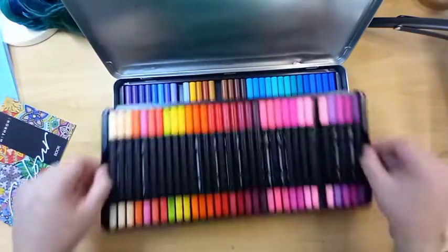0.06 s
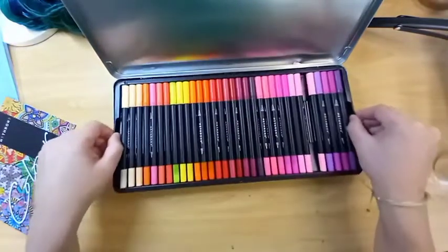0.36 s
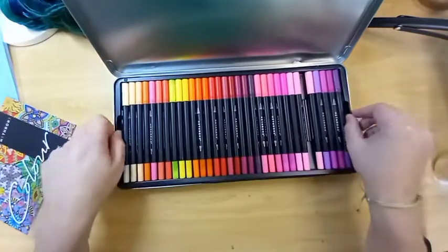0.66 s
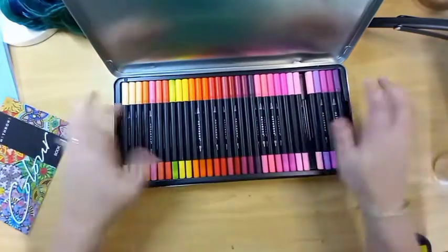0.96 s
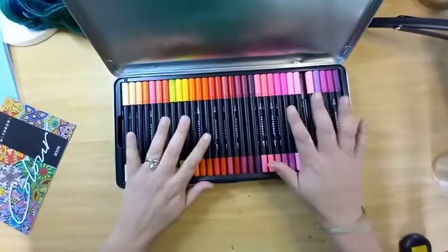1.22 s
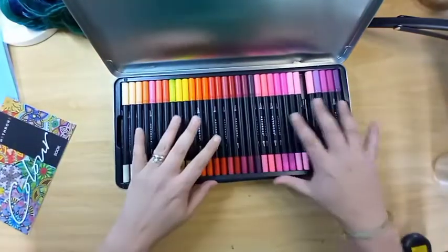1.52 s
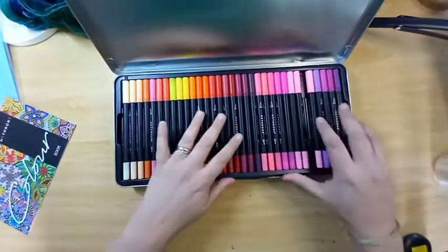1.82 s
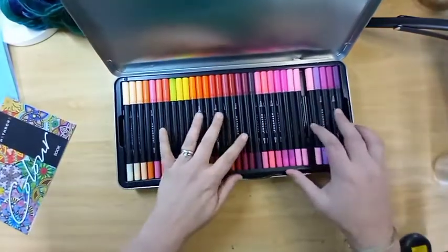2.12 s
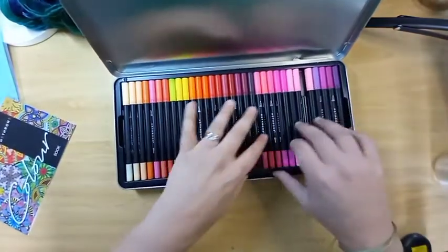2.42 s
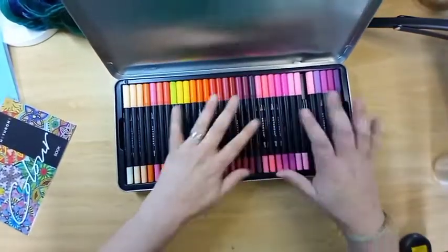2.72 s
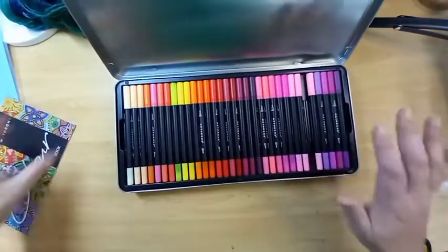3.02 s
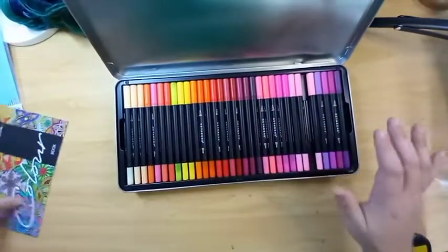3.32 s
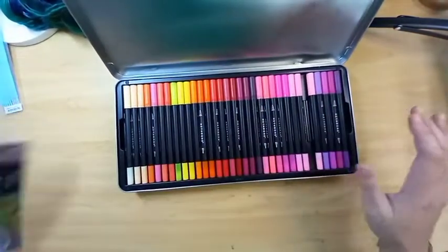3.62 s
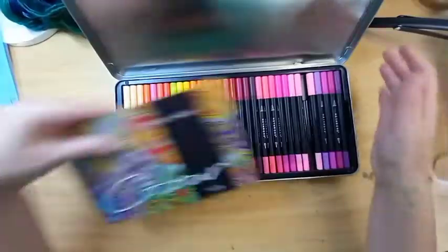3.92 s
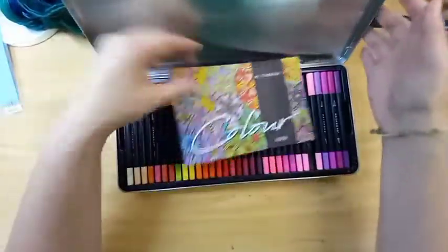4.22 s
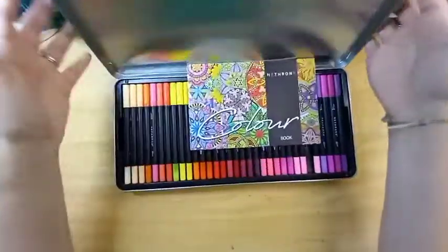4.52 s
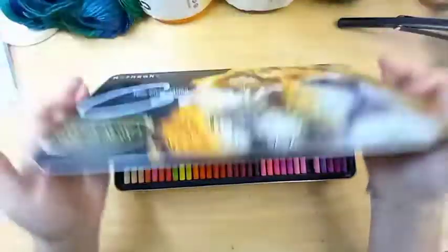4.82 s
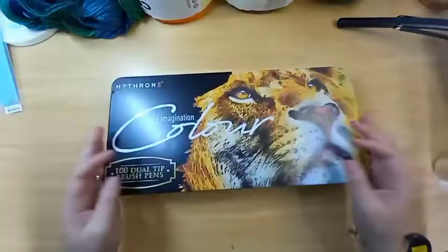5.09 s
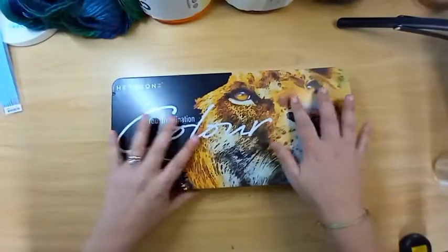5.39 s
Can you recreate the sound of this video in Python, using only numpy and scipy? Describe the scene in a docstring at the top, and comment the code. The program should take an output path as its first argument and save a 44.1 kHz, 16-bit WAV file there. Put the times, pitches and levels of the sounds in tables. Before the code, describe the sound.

Light plastic clicks, scrapes and soft rubbing as markers and a booklet are packed into a tin, ending with the metal lid knocking closed.

```python
"""A plastic tray of markers scrapes and knocks into a metal tin on a wooden desk; palms slide over the
clacking markers and press until the tray snaps home. A hand bumps the desk, and a booklet is dragged
over and dropped in. Last, the lid is swung down and pushed shut with a knock. Impacts ring each object's
damped modes, and friction sounds as noise full of tiny slips. Throughout, a small, dry room hums low
around a microphone pair hanging close above."""
import sys
import numpy as np
from scipy import signal
from scipy.fft import rfft, irfft, next_fast_len
from scipy.io import wavfile
from scipy.ndimage import uniform_filter1d, map_coordinates

SR = 44100
rng = np.random.default_rng(int(sys.argv[2]) if len(sys.argv) > 2 else 0)


def inscribe(sig):
    """Save sig as 16-bit PCM at rate SR to the path in sys.argv[1].

    A 1-D sig is mono; a 2-D sig holds one channel per row.
    Samples are clipped to [-1, 1] before scaling.
    """
    pcm = np.round(np.clip(np.atleast_2d(sig).T, -1, 1) * 32767)
    wavfile.write(sys.argv[1], SR, pcm.astype(np.int16))


N = 249243

# Friction spectrum of lid and fingers: (frequency [Hz], relative level [dB])
SOFT_RUB = [(210, -3.5), (350, 7), (560, 7), (800, 3), (1050, -9.5), (1500, -16.5), (2500, -19.5),
            (6400, -22.5), (13500, -20), (16000, -20)]


def tray():
    """Impact and friction: the tray scrapes into the tin, markers clack, and palms press it home."""
    # Impacts: (time [s], level [dB], brightness [dB], contact time [s])
    tray_hits = [(0.049, -56, -7, .001), (0.085, -29, -6.5, 0.00074), (0.148, -48, -14, 0.0014),
                 (0.184, -44.5, -15, 0.0004), (0.2215, -46.5, -3, 0.00085), (0.264, -46, -19, 0.0035),
                 (0.326, -43, -23.5, .0015), (0.3995, -34, -14.5, 0.0017), (0.406, -34.5, -12.5, 0.001),
                 (0.4225, -52, -22, 0.0018), (0.519, -54, -1, 0.0038), (0.9445, -57.5, 5.5, 0.0014),
                 (1.0055, -41, -13, 0.00091), (1.567, -45, -0.5, 0.0013), (1.6015, -30.5, -15.5, 0.0011),
                 (2.2175, -22, -7, 0.0017), (2.477, -32.5, -12, 0.0054), (2.495, -40.5, -31, 0.00046),
                 (2.5775, -32, -6.5, 0.004), (2.61, -31.5, -14, 0.0011), (2.6525, -32, -13.5, .0027),
                 (2.6605, -39.5, -24, 0.00053)]
    marker_hits = [(0.094, -43, 0.5, 0.0023), (0.169, -53, 0, 0.0011), (0.234, -53.5, -2, .0012),
                   (0.4225, -41.5, -11, 0.00065), (1.6325, -36.5, 2, 0.0014), (1.998, -70, 0.5, 0.0024),
                   (2.4725, -43, 2.5, 0.0056)]
    # Resonances: (frequency [Hz], bandwidth [Hz], gain [dB])
    modes = [(112, 22, 16), (335, 40, 4), (581, 36, 10), (712, 34, 14), (795, 45, 10), (925, 50, 8),
             (1150, 60, 4), (1905, 80, 11), (2070, 90, 7), (3150, 120, 4), (4700, 300, 3), (6900, 400, 3)]
    # Strokes: (time [s], duration [s], level [dB], brightness [dB])
    tray_strokes = [(0.005, 0.0067, -54.5, -24), (0.065, 0.022, -52, -2), (0.1, 0.083, -44, -8),
                    (0.225, 0.038, -44.5, -14.5), (0.345, 0.058, -48, -11.5), (0.4, 0.028, -40.5, -15.5),
                    (0.52, 0.026, -51, -4.5)]
    palm_strokes = [(0.955, 0.064, -51.5, -4), (1.11, 0.12, -60.5, 2.5), (1.25, 0.19, -62.5, 3.5),
                    (1.43, .14, -70.5, -1), (1.585, .13, -49.5, -4), (1.73, .1, -56.5, -1.5),
                    (1.84, 0.2, -63.5, 3.5), (2.04, .08, -77.5, 10.5), (2.125, 0.272, -60.5, 1),
                    (2.455, 0.028, -47.5, -2.5), (2.59, 0.067, -43.5, -9.5)]
    # Contact force and friction spectra: (frequency [Hz], relative level [dB])
    plastic_force = [(40, -7.5), (100, -6.5), (1500, 1.5), (2600, -3.5), (7000, -7.5), (10000, -8.5),
                     (16000, -13.5)]
    tray_rub = [(250, -18.5), (500, -9), (700, 0), (1000, -7.5), (1600, 0), (2500, -1.5), (5000, -8),
                (9000, -12), (16000, -20)]
    palm_rub = [(260, -16), (500, -4), (720, 3), (1100, -7), (1500, -3), (1950, 2), (2550, -7), (3200, -1),
                (4000, -6), (4800, -3), (7000, -6), (10000, -8), (13500, -4), (16000, -11)]
    knocks = impacts(tray_hits, modes, plastic_force, thump_db=-12, clack_db=0.5, rattle_growth=0.1,
                     pan_db=-1, chatter_db=5, room_db=5, wall_s=0.0054, push_hz=2000, bass_echo_db=5)
    clacks = impacts(marker_hits, modes, plastic_force, thump_db=-5.5, clack_db=7.5, rattle_growth=0,
                     pan_db=1.8, chatter_db=1.5, room_db=-6.5, wall_s=0.0054, push_hz=1890,
                     bass_echo_db=-6.5)
    shoves = stroke_gains(tray_strokes, attack_s=0.035, release_s=0.059, rasp_db=1)
    presses = stroke_gains(palm_strokes, attack_s=0.049, release_s=0.052, rasp_db=2.5)
    slide = friction(shoves, tray_rub, slips_per_s=650, slip_share=0.28, uneven_db=4, patchy_db=1.5)
    palms = friction(presses, palm_rub, slips_per_s=530, slip_share=0.22, uneven_db=2.5, patchy_db=2)
    return knocks + clacks + slide + palms


def booklet():
    """Stick-slip, then impact: the booklet drags, its edge catches, and it slaps onto the markers."""
    # Impacts: (time [s], level [dB], brightness [dB], contact time [s])
    hits = [(3.322, -50.5, 7.5, 0.0088), (3.389, -48, 8.5, 0.0024), (3.68, -80, 15, 0.0022),
            (3.733, -59.5, -21, 0.0014), (4.084, -46.5, 5, 0.0043), (4.0975, -31.5, -3.5, 0.0024),
            (4.128, -32.5, -6.5, 0.00053)]
    # Resonances: (frequency [Hz], bandwidth [Hz], gain [dB])
    modes = [(128, 14, 17), (205, 30, 9), (330, 45, 12), (600, 70, 4), (730, 70, 5), (1030, 90, 6),
             (1400, 100, 4), (1900, 120, 3)]
    # Strokes: (time [s], duration [s], level [dB], brightness [dB])
    cover_strokes = [(3.15, .055, -71.5, 19), (3.305, 0.021, -51.5, 6.5), (3.36, 0.03, -56, 3),
                     (3.47, 0.087, -58.5, -1.5), (3.59, 0.16, -75.5, 3), (3.93, 0.045, -64.5, 4),
                     (4, 0.055, -68, 22), (4.105, 0.035, -41.5, -23)]
    edge_strokes = [(3.225, .028, -53.5, -7.5), (3.34, 0.029, -50, 3), (3.42, .04, -56.5, -6),
                    (4.1, 0.055, -42.5, -16.5)]
    # Contact force and friction spectra: (frequency [Hz], relative level [dB])
    card_force = [(40, -16), (100, 33), (1000, -1.5), (2500, 0), (5000, -1.5), (9000, -8.5), (16000, -15)]
    cover_rub = [(240, -16), (400, -3), (490, 4), (600, -4), (780, -1), (1100, -6), (1550, -2), (2000, -3),
                 (2600, -5), (3900, -3), (7500, -7), (12000, -9), (16000, -14)]
    edge_rub = [(300, -8), (550, -5.5), (1100, -10), (1450, 4), (2000, -2.5), (2500, 3), (4000, 1),
                (8000, -8), (16000, -15)]
    slaps = impacts(hits, modes, card_force, thump_db=-9.5, clack_db=0.5, rattle_growth=0.8, pan_db=0.6,
                    chatter_db=-1.5, room_db=0, wall_s=0.0015, push_hz=1500, bass_echo_db=2.5)
    drags = stroke_gains(cover_strokes, attack_s=0.035, release_s=0.088, rasp_db=-1)
    catches = stroke_gains(edge_strokes, attack_s=0.017, release_s=0.045, rasp_db=7)
    slide = friction(drags, cover_rub, slips_per_s=610, slip_share=0.2, uneven_db=1, patchy_db=7.5)
    edge = friction(catches, edge_rub, slips_per_s=300, slip_share=0.5, uneven_db=2, patchy_db=5)
    return slaps + slide + edge


def lid():
    """Plate resonance and friction: the hinge clicks, the rim rubs, and the metal lid knocks shut."""
    # Impacts: (time [s], level [dB], brightness [dB], contact time [s])
    hits = [(4.7525, -39, -15.5, 0.0003), (4.8025, -37, 5, 0.00054), (4.9185, -45.5, 10, 0.002),
            (4.9775, -38.5, 6, .001), (4.983, -31.5, -12, 0.00069), (5.2735, -33.5, -27.5, .0005),
            (5.3315, -27.5, -21, .0012), (5.3757, -17, -10, 0.001)]
    # Resonances: (frequency [Hz], bandwidth [Hz], gain [dB])
    modes = [(115, 16, 14), (164, 11, 15), (228, 20, 12), (275, 35, 11), (330, 26, 20), (383, 24, 7),
             (577, 22, 9), (673, 28, 10), (750, 30, 7), (808, 30, 11), (935, 38, 11), (1033, 34, 14),
             (1120, 35, 5), (3600, 450, 4), (6200, 500, 3), (8600, 700, 5)]
    # Strokes: (time [s], duration [s], level [dB], brightness [dB])
    strokes = [(4.39, 0.19, -59.5, 3.5), (4.535, 0.2, -54, -0.5), (4.825, 0.044, -45, -10),
               (4.95, 0.055, -36, -12), (5.245, 0.2, -43.5, -20.5)]
    # Contact force spectrum: (frequency [Hz], relative level [dB])
    metal_force = [(35, -4.5), (75, 10.5), (130, 4), (260, -3), (450, -2), (1050, -13.5), (1400, -18.5),
                   (3500, -18), (9000, -12), (13000, -15.5), (16000, -14)]
    knocks = impacts(hits, modes, metal_force, thump_db=-2.5, clack_db=-4, rattle_growth=0.29,
                     pan_db=-0.5, chatter_db=0.5, room_db=4.5, wall_s=0.0016, push_hz=1500,
                     bass_echo_db=-3.5)
    swing = stroke_gains(strokes, attack_s=0.058, release_s=0.054, rasp_db=0.5)
    rim = friction(swing, SOFT_RUB, slips_per_s=660, slip_share=0.083, uneven_db=2, patchy_db=0.5)
    return knocks + rim


def hands():
    """Damped oscillation of the desk under a hand's bump, and light friction of brushing fingers."""
    # Desk mode: (time [s], level [dB], frequency [Hz], T60 [s])
    desk_bump = (3.003, -28, 118, .24)
    # Strokes: (time [s], duration [s], level [dB], brightness [dB])
    strokes = [(1.28, 0.116, -69, 16.5), (1.42, 0.3, -69, 12), (3.085, .04, -52, -2.5),
               (3.72, 0.23, -74.5, 2), (4.2, 0.09, -67, 6.5), (4.305, 0.08, -63.5, 16.5),
               (5.2, .03, -65.5, 13)]
    start, db, hz, t60 = desk_bump
    age = np.maximum(np.arange(N) / SR - start, 0)
    onset = 1 - np.exp(-age / 0.0027)
    bump = onset * amp(db - 60 * age / t60) * np.sin(2 * np.pi * hz * age)
    brushes = stroke_gains(strokes, attack_s=0.044, release_s=0.044, rasp_db=-8.5)
    skin = friction(brushes, SOFT_RUB, slips_per_s=570, slip_share=0.08, uneven_db=0.8, patchy_db=2.5)
    return bump + skin


def impacts(hits, modes, force, thump_db, clack_db, rattle_growth, pan_db, chatter_db, room_db,
            wall_s, push_hz, bass_echo_db, size=12288):
    """Modal excitation: a force pulse, its chatter and its room echo pass through the object's modes."""
    # Limits of the thump, body, clack and click bands: (frequency [Hz])
    band_edges = [25, 450, 1300, 3500, 16500]
    # How far each band follows a hit's brightness: (slope [dB/dB])
    tilt = [-0.14, 0.18, 0.87, 1]
    out = np.zeros((2, N + 2 * size))
    t = np.arange(size) / SR
    hz = np.fft.rfftfreq(2 * size, 1 / SR)
    resonances = np.array([amp(db) * 1j * hz * width / (centre ** 2 - hz ** 2 + 1j * hz * width)
                           for centre, width, db in modes])
    contact = minimum_phase(amp(along(force, hz)))
    push = 1 / (1 + 1j * hz / push_hz) ** 2  # rounded pulse, alike at both microphones
    bass_shelf = minimum_phase(amp(along([(300, bass_echo_db), (900, 0)], hz)))
    early = SR // 40  # a band's level holds for its first 25 ms
    pan = amp([[pan_db / 2], [-pan_db / 2]])
    for start, level_db, bright_db, contact_s in hits:
        # loose parts meet one after another, so the chatter swells and dies
        progress = t / contact_s
        chatter = spread(rng.standard_normal((2, size)) * progress * np.exp(-progress))
        echo = room_tail(size) * (1 - np.exp(-(t / wall_s) ** 2))
        echo_db = room_db + rattle_growth * bright_db
        diffuse = amp(chatter_db) * unit(chatter) / np.sqrt(size) + amp(echo_db) * echo
        strengths = amp(rng.normal(0, 1, len(modes)))  # each spot favours other modes
        body = contact * (1 + strengths @ resonances)
        ring = irfft((push + bass_shelf * rfft(diffuse, 2 * size)) * body)[:, :size]
        # a harder contact is brighter and thumps less
        levels_db = level_db + np.array([thump_db, 0, clack_db, 0]) + bright_db * np.array(tilt)
        bands = split_bands(ring, band_edges)
        hit = sum(amp(db) * band / np.std(band[:, :early]) for db, band in zip(levels_db, bands))
        out[:, round(start * SR):][:, :size] += hit * pan
    return out[:, :N]


def friction(gains, colour, slips_per_s, slip_share, uneven_db, patchy_db):
    """Stick-slip friction: tiny random slips over a smooth rub, heard as scrape, rasp and hiss."""
    slips = (rng.random(N) < slips_per_s / SR) * rng.standard_normal((2, N))
    smooth = rng.standard_normal((2, N))
    drive = spread(np.sqrt(slip_share) * unit(slips) + np.sqrt(1 - slip_share) * smooth)
    rub = filtered(surface_patches(drive, patchy_db), lambda hz: amp(along(colour, hz)))
    grip_db = uneven_db * wobble(90)  # uneven grip shakes the low scrape most
    bands = split_bands(rub, [150, 1200, 5000, 16500])
    return sum(unit(band) * gains[k] * amp(grip_db / (k + 1)) for k, band in enumerate(bands))


def stroke_gains(strokes, attack_s, release_s, rasp_db):
    """Incoherent strokes add in power, giving the envelopes of scrape, rasp and hiss."""
    t = np.arange(N) / SR
    power = np.zeros((3, N))
    for start, length_s, db, bright_db in strokes:
        before = np.maximum(start - t, 0) / attack_s
        after = np.maximum(t - start - length_s, 0) / release_s
        band_gains = amp(db + np.array([0, rasp_db + bright_db / 2, bright_db]))
        power += np.outer(band_gains, amp(-20 * (before + after))) ** 2
    return np.sqrt(power)


def surface_patches(x, depth_db):
    """Spectral modulation: a rub's low colour shifts along the surface while its hiss stays even."""
    hz, _, spectra = signal.stft(x, SR, nperseg=512)
    field = rng.standard_normal(spectra.shape[1:])
    field = uniform_filter1d(field, size=8, axis=0)
    field = uniform_filter1d(field, size=9, axis=1)
    depth = depth_db / (1 + (hz[:, None] / 3500) ** 2)
    return signal.istft(spectra * amp(depth * unit(field)), nperseg=512)[1][:, :N]


def room_tail(size):
    """Reverberation: a diffuse stereo decay of energy 1, each frequency dying at its own rate."""
    # Reverberation time: (frequency [Hz], T60 [s])
    decay_times = [(100, 0.32), (300, 0.13), (900, 0.11), (3000, 0.14), (9000, 0.13), (16000, .125)]
    hz, t, spectra = signal.stft(rng.standard_normal((2, size)), SR, nperseg=256)
    decay = amp(-60 * t / along(decay_times, hz)[:, None])
    tail = signal.istft(spectra * decay, SR, nperseg=256)[1][:, :size]
    return unit(spread(tail)) / np.sqrt(size)


def background(rumble_db=-49.5, waver_db=4.5, drift_rad=0.84):
    """Amplitude and phase modulation make a low hum waver over the room's rumble and faint hiss."""
    # Hum partials: (frequency [Hz], level [dB])
    partials = [(75.3, -50.5), (129.2, -61), (242.2, -67), (339.1, -71.5)]
    # Room noise spectrum: (frequency [Hz], relative level [dB])
    ambience = [(20, -39.5), (38, -30.5), (54, -5.5), (80, 0), (100, -8), (135, -4.5), (185, -17.5),
                (250, -14.5), (400, -25), (560, -36), (1000, -53), (2400, -54), (7000, -57), (14000, -51.5),
                (16000, -53.5)]
    t = np.arange(N) / SR
    hum = 0
    for hz, db in partials:
        peak = np.sqrt(2) * amp(db + waver_db * wobble(6))
        hum += peak * np.sin(2 * np.pi * hz * t + drift_rad * wobble(4))
    noise = spread(rng.standard_normal((2, N)))
    air = unit(filtered(noise, lambda hz: amp(along(ambience, hz))))
    return (hum + amp(rumble_db) * air) * amp([[-1.1], [1.1]])


def spread(pair):
    """Spatial coherence: two independent signals become left and right, alike only at low frequencies."""
    # Likeness at the two microphones: (frequency [Hz], correlation [-1 to 1])
    coherence = [(60, .91), (330, .98), (700, .72), (1400, .25), (3000, -.05), (16000, -.05)]

    def weights(hz):
        angle = np.arccos(along(coherence, hz)) / 2
        return np.array([np.cos(angle), np.sin(angle)])

    mid, side = filtered(pair, weights)
    return np.array([mid + side, mid - side])


def amp(db):
    """Decibels to gain."""
    return 10 ** (np.asarray(db) / 20)


def unit(x):
    """Normalisation to rms 1."""
    return x / np.sqrt(np.mean(x ** 2) + 1e-20)


def along(points, hz):
    """Interpolation of (frequency [Hz], value) points on a log axis."""
    freqs, values = np.transpose(points)
    return np.interp(np.log(hz + 1), np.log(freqs + 1), values)


def wobble(rate):
    """A smooth random curve, rate knots a second."""
    knots = rng.standard_normal(int(N * rate / SR) + 4)
    return map_coordinates(knots, [np.arange(N) * rate / SR], order=2)


def split_bands(x, edges_hz):
    """A filter bank: one band between each two neighbouring edges."""
    return [signal.sosfilt(signal.butter(3, band, 'band', fs=SR, output='sos'), x)
            for band in zip(edges_hz, edges_hz[1:])]


def filtered(x, response):
    """Linear filtering: the spectrum of x times a frequency response."""
    n = x.shape[-1]
    padded = 2 * next_fast_len(n // 2 + 2048)
    return irfft(rfft(x, padded) * response(np.fft.rfftfreq(padded, 1 / SR)), padded)[..., :n]


def minimum_phase(gain):
    """The causal response of least delay with this gain."""
    cepstrum = irfft(np.log(np.maximum(gain, 1e-6)))
    half = len(cepstrum) // 2
    cepstrum[1:half] *= 2
    cepstrum[half + 1:] = 0
    return np.exp(rfft(cepstrum))


def scene():
    """Superposition of everything on the desk and the room's background."""
    return tray() + booklet() + hands() + lid() + background()


def record(dry):
    """Band limiting: a steep low-pass removes the highest treble."""
    cutoff_hz = 16050
    return filtered(dry, lambda hz: 1 / np.sqrt(1 + (hz / cutoff_hz) ** 200))


dry = scene()
out = record(dry)
inscribe(out)
```